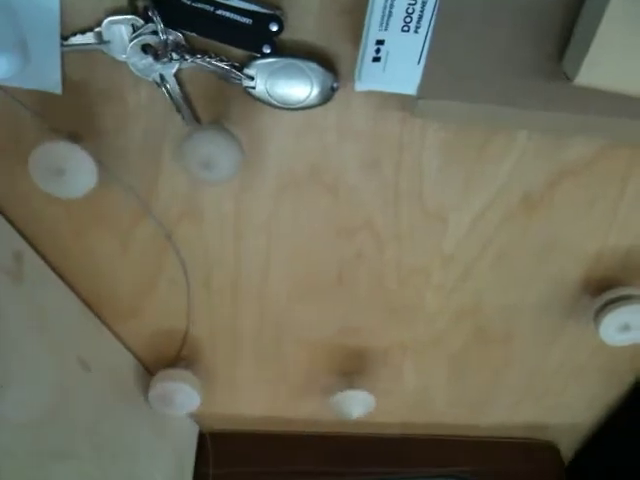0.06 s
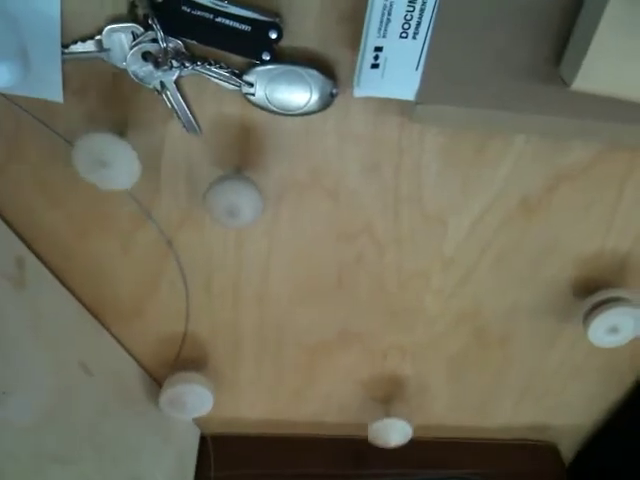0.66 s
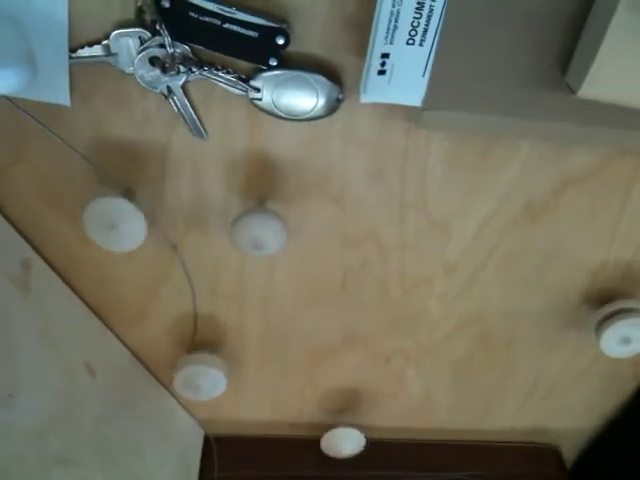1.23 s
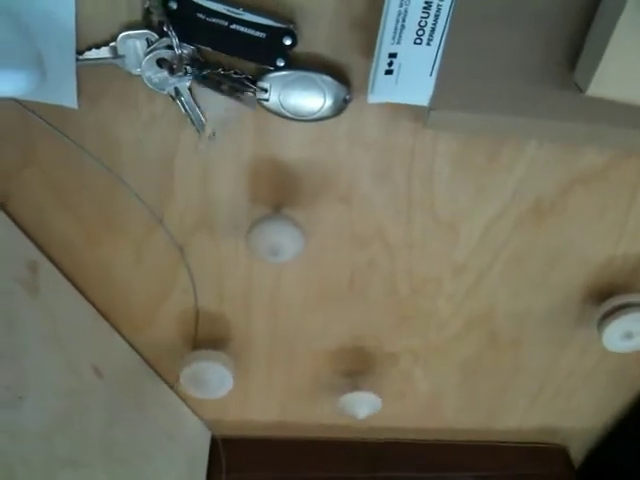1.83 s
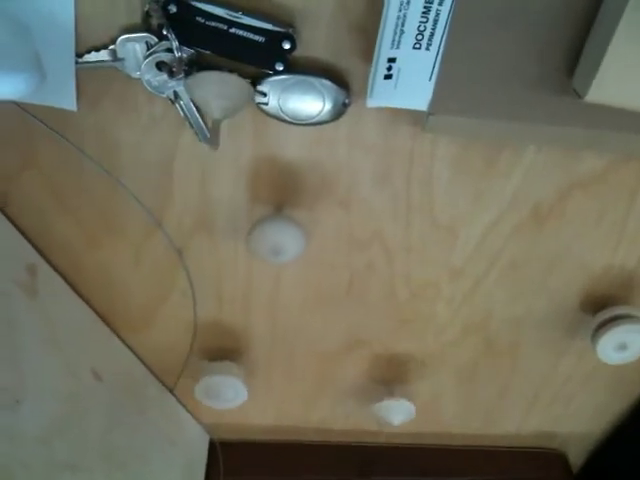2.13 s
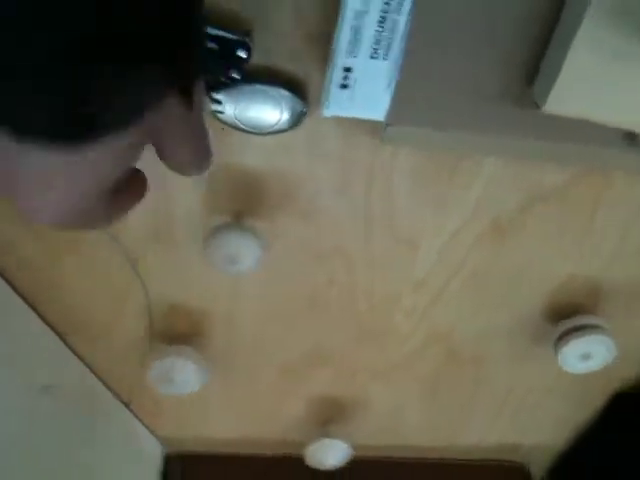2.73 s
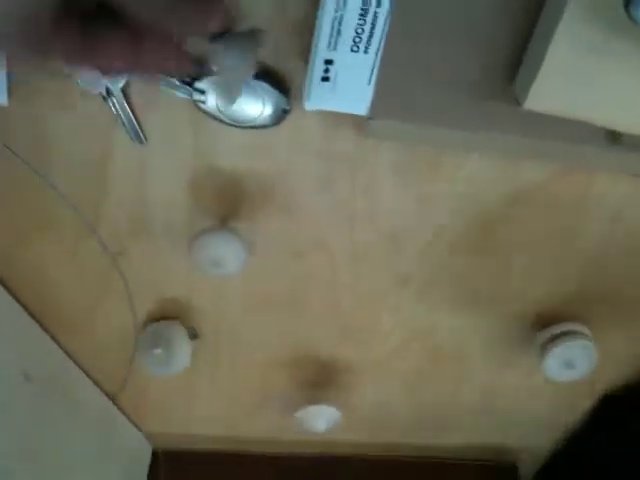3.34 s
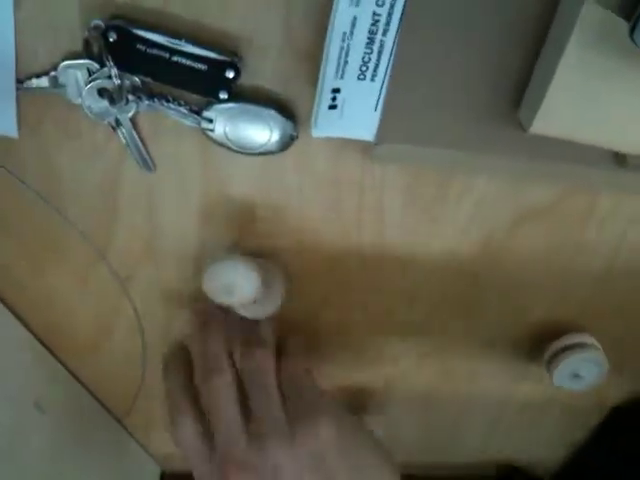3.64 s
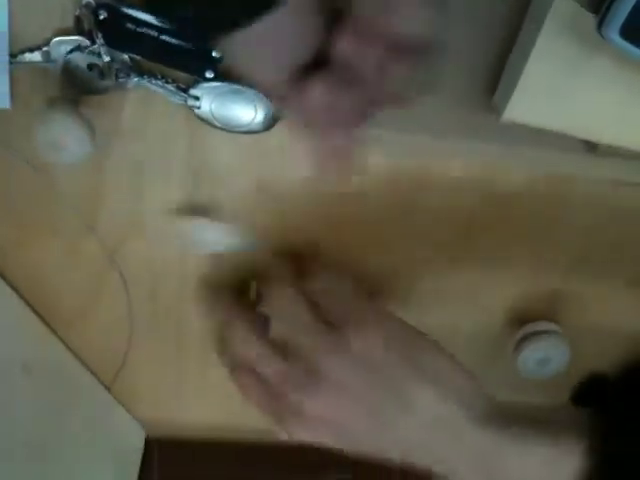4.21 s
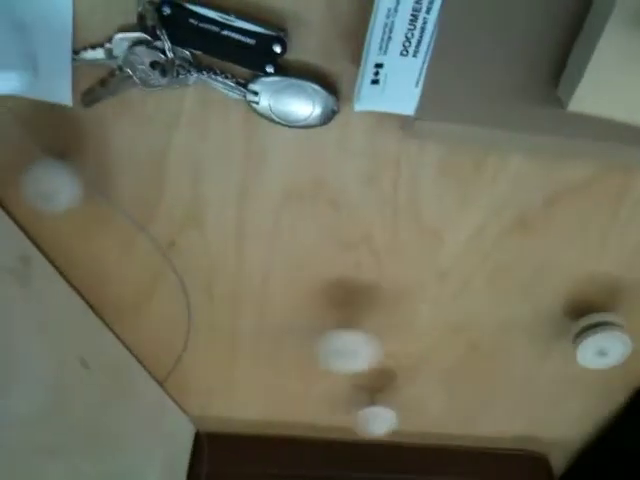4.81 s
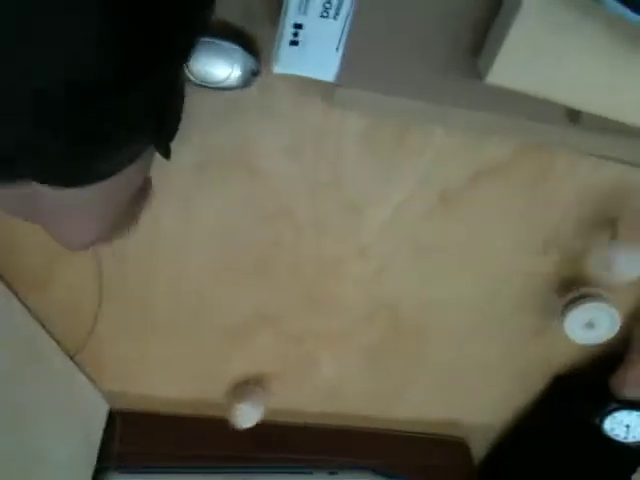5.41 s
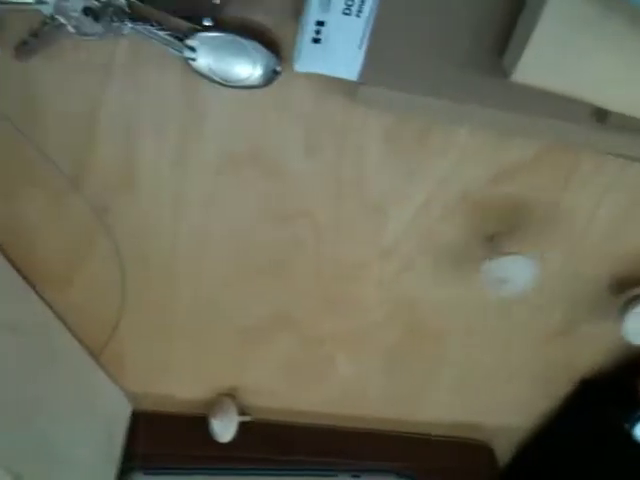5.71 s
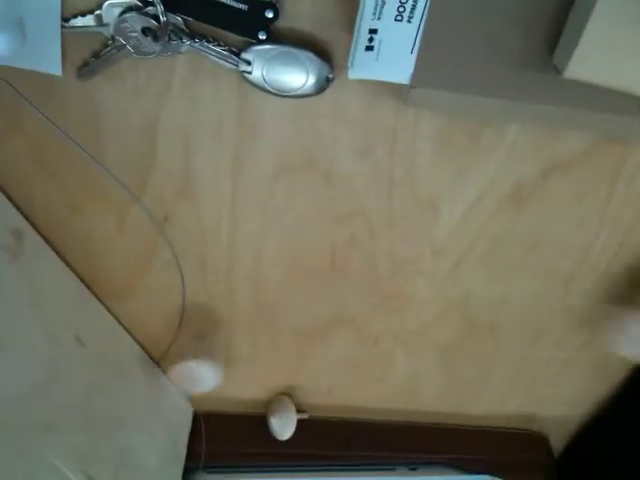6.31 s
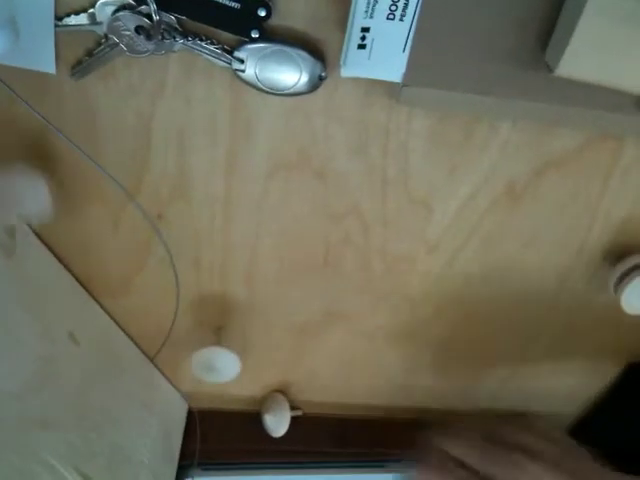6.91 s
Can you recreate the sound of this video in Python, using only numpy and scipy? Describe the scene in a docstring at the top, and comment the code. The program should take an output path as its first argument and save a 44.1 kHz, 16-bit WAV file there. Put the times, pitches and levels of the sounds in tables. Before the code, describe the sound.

Small tops spin on a plywood board, heard from close above in a small room with a faint steady hiss. A soft, wavering whirr and fine chatter run throughout, with a thin high whine at first. Around 1.4 to 2 seconds a top clicks and bounces, jostling a bunch of keys with a faint jingle. A few hollow knocks come just after 3 seconds, and a sharp collision at 3.7. Near 4 seconds a hand and sleeve swish softly past. At about 4.3 a dropped top lands with a loud crack, skids with a gritty clatter and bounces. Light taps and quick rattles continue, with a small metallic clink around 5.5 seconds. The hardest clack comes at 6.3, followed by a fast, uneven run of hollow wooden knocks until about 7 seconds.

```python
"""Spinning tops on plywood

A small room, one microphone close above a plywood board. Small tops whirr, chatter and whine as their
tips run over the grain; rims and fingers knock on the wood, ringing its modes. Tops collide, one runs
into a bunch of keys, a metal one chimes. A hand sweeps past and drops a freshly spun top, which skids
and bounces about. Behind it all lie the room's short decay and a steady hiss."""
import sys
import numpy as np
from scipy import signal
from scipy.fft import rfft, irfft, next_fast_len
from scipy.io import wavfile

SR = 44100
rng = np.random.default_rng(int(sys.argv[2]) if len(sys.argv) > 2 else 0)


def transcribe(u):
    """Save the signal u as a 16-bit wav file named by the first command-line argument.

    u: samples, shape (n,) or (channels, n), limited to [-1, 1]; the rate is SR.
    q: integer samples, one column per channel.
    """
    v = np.clip(np.atleast_2d(u).T, -1, 1)
    q = np.round(v * 32767).astype(np.int16)
    wavfile.write(sys.argv[1], SR, q)


N = 306495
TIME = np.arange(N) / SR
AGE = TIME[:SR // 8]   # seconds since a contact


# tips spinning just below the microphone: t/s, whirr level/dB, chatter level/dB (both before trim)
SPIN = [(0.0, -52.5, -53.6), (1.2, -55.5, -53), (1.66, -50.5, -47.5), (2.22, -55, -57.4),
        (2.94, -57, -61.5), (3.23, -54, -51), (4.14, -54.5, -57), (4.59, -56.5, -44.5), (4.99, -50, -50),
        (5.34, -56, -45.5), (5.57, -53.5, -45.5), (6.27, -55.5, -51.5), (6.54, -52, -49),
        (6.95, -52.5, -66)]
def spinning(whirr_trim_db=-0.98, chatter_trim_db=-6.5):
    """Smooth rolling gives a dull whirr, tiny hops a brighter chatter; both swell as the tops wobble."""
    whirr_db, chatter_db = in_time(SPIN)
    wobble_db = drift(rate=27)
    rolling = cut(board_bumps(per_s=2500, spread_db=3), 476, "low", order=1)
    whirr = rms_one(cut(rolling, 1540, "low"))
    chatter = rms_one(cut(board_bumps(per_s=900, spread_db=2), 2750, "low", order=6))
    return (whirr * from_db(whirr_trim_db + whirr_db + wobble_db)
            + chatter * from_db(chatter_trim_db + chatter_db + wobble_db))


def board_bumps(per_s, spread_db):
    """Tips bump over the grain and ring the board at six spots."""
    bumps, spot = clicks(per_s, spread_db), rng.integers(0, 6, N)
    out = np.zeros(N)
    for k in np.unique(spot):
        ring = board_ring(new_place(), place_db=1.5, detune=0.026)
        out += signal.oaconvolve(bumps * (spot == k), ring)[:N]
    return out


# modes of the plywood board: f/Hz, level/dB, t60/s
BOARD = [(268.8, -12.5, 0.044), (349.3, -13, 0.029), (605, -9.5, 0.027), (847, -8.5, 0.029),
         (1020, -4.5, 0.017), (1417, -6, 0.015), (1610, -5, 0.023), (1961, -2.5, 0.018),
         (2216, -5.5, 0.024), (2441, -4, 0.029), (2707, -10, 0.033), (2960, -6.5, 0.02), (3520, -5, 0.0065)]
def board_ring(place, place_db, detune, thump_db=0):
    """One blow on the board: its place sets how strongly each mode rings, its weight the low ones."""
    hz, db, t60 = np.transpose(BOARD)[:, :, None]
    shift = 1 + detune * rng.standard_normal(hz.shape)
    signs = (-1) ** np.arange(len(BOARD))[:, None]
    gain = from_db(db + place_db * place[:, None] + thump_db * (hz < 1200))
    modes = signs * gain * struck(t60, rise_s=0.00005) * np.sin(2 * np.pi * hz * shift * AGE)
    return attack_one(modes.sum(axis=0))


def new_place():
    """A random spot on the board, as one weight for each mode."""
    return rng.standard_normal(len(BOARD))


# the hardest contacts: t/s, board level/dB, crack level/dB, top's ring level/dB
STRIKES = [(1.4443, -37, -44, -64), (1.459, -45, -48, -44), (1.7278, -41.5, -39, -30),
           (3.7148, -37, -37.5, -34.5), (4.3465, -24, -27.5, -60), (4.3507, -28.5, -34, -38),
           (4.4246, -28.5, -34.5, -44), (4.4625, -32, -34, -47), (4.472, -29.5, -35.5, -43),
           (4.7371, -34.5, -42, -61), (5.5, -36, -54, -49), (5.5423, -44, -48, -34.5),
           (5.578, -34.5, -50, -40), (6.3372, -18.5, -40, -30.5), (6.411, -27, -44, -40),
           (6.4687, -27.5, -37.5, -41)]
# spectrum of a contact's dry crack: f/Hz, level/dB
CRACK_SPECTRUM = [(2400, -9), (3400, 9), (4200, 12.5), (5300, 1.5), (6300, -5), (8000, 4.5), (12000, -13.5),
                  (16000, -19)]
# the two notes of whichever top is being knocked about: from t/s, main f/Hz, second f/Hz
TOP_NOTES = [(0, 7950, 9000), (1.3, 10850, 7250), (2.5, 9135, 6168), (4.2, 10970, 7800), (5.52, 8480, 6400),
             (6.1, 8020, 8400)]
def strikes():
    """A hard contact cracks and rings both board and top; quick bounces land on the same spot."""
    out, rough, last = np.zeros(N), noise(CRACK_SPECTRUM), -1
    for s, board_db, crack_db, ring_db in STRIKES:
        if s - last > .03:
            place, start = new_place(), rng.integers(N - len(AGE))
        last = s
        crack = attack_one(rough[start:start + len(AGE)] * struck(t60=0.016, rise_s=0.00032))
        _, main_hz, second_hz = TOP_NOTES[sum(s > row[0] for row in TOP_NOTES[1:])]
        main = top_ring(main_hz, t60=0.016, snap_db=-13.5)
        second = top_ring(second_hz, t60=0.0027, snap_db=-6.0)
        ring = attack_one(main + from_db(-3.5) * second)
        board = board_ring(place, place_db=2.0, detune=0.02, thump_db=thump_at(s))
        board = with_hollow(board, s, hollow_db=-9)
        # a brief, hard contact puts less into the board's bass
        board = attack_one(cut(board, 170, "high", order=1))
        add(out, s, from_db(board_db) * board + from_db(crack_db) * crack + from_db(ring_db) * ring)
    return out


def top_ring(hz, t60, snap_db):
    """A top's own high, short note, started by a gritty snap."""
    tone = np.sin(2 * np.pi * hz * (1 + rng.normal(0, 0.0031)) * AGE)
    note = attack_one(tone * struck(t60, rise_s=0.00035))
    burst = rng.standard_normal(len(AGE)) * struck(t60=0.018, rise_s=0.00061)
    snap = attack_one(cut(burst, [0.83 * hz, 1.28 * hz], "band"))
    return attack_one(note + from_db(snap_db) * snap)


# lift of the board's low modes in a contact: t/s, level/dB
THUMP = [(1.75, 3.5), (3.75, 4), (4.35, 0.5), (5.0, -2.5), (5.31, 1), (5.7, -6.5), (6.34, -1), (6.65, 2.5)]
def thump_at(s):
    """The low modes are full in falls and thin in light skittering."""
    return np.interp(s, *np.transpose(THUMP))


# hollow note of a contact: t/s, f/Hz
HOLLOW_NOTE = [(3.15, 1730), (3.75, 2014), (4.35, 1020), (4.42, 2000), (4.85, 2200), (5.05, 1867),
               (5.31, 2471), (5.46, 1930), (6.67, 1940), (6.89, 1950)]
def with_hollow(board, s, hollow_db):
    """Add a hollow, woody note, which shifts as the tops wander over the board."""
    hollow = resonance(board, np.interp(s, *np.transpose(HOLLOW_NOTE)), width_hz=240)
    return attack_one(board + from_db(hollow_db) * attack_one(hollow))


def taps():
    """A rim or hand rings the board with a hollow note and faint dry edge; quick touches share a spot."""
    out, last = np.zeros(N), -1
    rough = cut(noise(CRACK_SPECTRUM), 4300, "low")
    for s, board_db, edge_db, hollow_db in soft_touches():
        if abs(s - last) > .019:
            place = new_place()
        last = s
        start = rng.integers(N - len(AGE))
        edge = attack_one(rough[start:start + len(AGE)] * struck(t60=0.021, rise_s=0.00038))
        board = board_ring(place, place_db=2.2, detune=.015, thump_db=thump_at(s))
        board = with_hollow(board, s, hollow_db)
        # a soft contact leaves the board's treble quiet
        board = attack_one(cut(board, 3050, "low", order=4))
        add(out, s, from_db(board_db) * board + from_db(edge_db) * edge)
    return out


# dull knocks on the wood, alone or in quick runs, from a rim or hand: t/s, board level/dB
KNOCKS = [(2.021, -49.5), (3.1057, -39), (3.1606, -34.5), (3.203, -41.5), (3.701, -39.5), (3.734, -58),
          (4.245, -51.5), (4.303, -42.5), (4.8056, -36.5), (5.531, -37.5), (6.5249, -30.5), (6.547, -41.2),
          (6.5655, -35.2), (6.5922, -37), (6.61, -38.5), (6.633, -33.5), (6.6712, -32.5), (6.6939, -34),
          (6.7314, -31), (6.76, -32), (6.7908, -34.3), (6.8146, -38.5), (6.8418, -40.5), (6.8933, -31.5),
          (6.93, -32.5), (6.9401, -29.2)]
# a top bounces on its rim: t/s, board level/dB, edge level/dB, first hop/s, number of touches
BOUNCES = [(1.3736, -45, -51, 0.0082, 2), (1.475, -45, -50.5, 0.019, 3), (1.7825, -39.5, -53, 0.024, 4),
           (3.754, -29, -47.5, 0.029, 2), (4.564, -32, -40.5, 0.053, 2), (4.831, -35, -54, 0.026, 2),
           (4.8716, -38.5, -65, 0.021, 3), (4.931, -37.5, -54, 0.019, 4), (4.979, -37.5, -65, 0.024, 2),
           (5.136, -36.5, -44, 0.028, 5), (5.3099, -34.5, -48, 0.038, 4), (5.4565, -35, -46, 0.0058, 2)]
# quick runs of light taps, from a leaning top or fingers bumping the board:
# start t/s, end t/s, tap rate/Hz, board level/dB
TAP_RUNS = [(3.115, 3.139, 114, -45), (3.8, 3.843, 102, -45.5), (4.014, 4.097, 56, -49),
            (4.625, 4.68, 42, -42.5), (5.012, 5.106, 81, -44), (5.591, 5.665, 60, -48),
            (5.689, 5.722, 60, -43), (5.768, 5.824, 72, -46), (5.838, 5.897, 71, -45),
            (5.931, 5.972, 121, -49.5), (6.064, 6.099, 120, -47), (6.222, 6.271, 124, -48)]
def soft_touches(hop_ratio=.8, loss_db=3, hollow_db=-6, run_hollow_db=1):
    """Dull knocks, bounces that get shorter and weaker, and evenly spaced runs of light taps."""
    # t/s, board level/dB, edge level/dB, hollow note against the board/dB
    touches = [(s, board_db, board_db - 24, hollow_db) for s, board_db in KNOCKS]
    for s, board_db, edge_db, hop_s, count in BOUNCES:
        for k in range(round(count)):
            touches.append((s, board_db - k * loss_db, edge_db - k * loss_db, hollow_db))
            s += hop_s * hop_ratio ** k
    for start, end, taps_per_s, board_db in TAP_RUNS:
        for s in np.arange(start, end, 1 / taps_per_s):
            db = board_db + rng.normal(0, 2.3)
            touches.append((s, db, db - 25, run_hollow_db))
    return touches


def skid(start_s=4.355, db=-41.5, t60=0.49):
    """The dropped top lands at full spin and grinds over the wood: a dense, bright, dying clatter."""
    envelope = np.zeros(N)
    add(envelope, start_s, from_db(db) * dying(t60, TIME[:SR]))
    grit = cut(clicks(per_s=3300, spread_db=-1), [1000, 5000], "band", order=4)
    return envelope * rms_one(cut(grit, 4500, "low", order=1))


def thuds():
    """A faint low thud near 135 Hz under each strike and knock."""
    pulses, pulse = np.zeros(N), attack_one(struck(t60=0.033, rise_s=0.0017))
    for s, board_db, *_ in list(STRIKES) + list(KNOCKS):
        add(pulses, s, from_db(board_db - 19) * pulse)
    return resonance(pulses, hz=135, width_hz=30)


# single grazes of a rim: t/s, ring level/dB
GRAZES = [(3.02, -55.5), (3.616, -56), (5.112, -45.5), (6.202, -49), (6.3758, -39.5)]
def grazes(note_hz=7950):
    """A nudge or graze rings a top's own note; it also sounds faintly with each knock."""
    out = np.zeros(N)
    with_knocks = [(s, board_db - 20) for s, board_db in KNOCKS]
    for s, db in nudges() + list(GRAZES) + with_knocks:
        add(out, s, from_db(db) * top_ring(note_hz, t60=0.026, snap_db=-2.5))
    return out


def nudges(count=8, start_s=.0208, first_gap_s=.041, gap_growth=1.055, db=-53):
    """Two tops nudge each other ever more slowly as they drift apart: rows of t/s, level/dB."""
    gaps = first_gap_s * gap_growth ** np.arange(count)
    return [(s, db + rng.normal(0, 1)) for s in start_s + np.cumsum(gaps) - gaps]


# hits on the metal top: t/s, level/dB
CHIMES = [(5.524, -48.5), (5.556, -46.5), (5.574, -54)]
# modes of the metal top: f/Hz, level/dB, t60/s
METAL_MODES = [(6210, 4, 0.18), (6340, 1, 0.13), (6800, 11, 0.016), (8100, 6, 0.011)]
def chimes():
    """The metal top clinks under quick touches that catch each mode differently, then buzzes faintly."""
    out, age = np.zeros(N), TIME[:SR // 2]
    contact = (1 - np.exp(-age / .003)) * (dying(0.04, age) + from_db(-20) * dying(.4, age))
    for s, db in CHIMES:
        for hz, mode_db, t60 in METAL_MODES:
            touches = energy_one(clicks(per_s=860, spread_db=7)[:len(age)] * contact)
            ring = dying(t60, age) * np.sin(2 * np.pi * hz * age)
            add(out, s, from_db(db + mode_db) * signal.oaconvolve(touches, ring))
    return out


# a top runs into the keys: t/s, level/dB
KEY_HITS = [(1.475, -51.5), (1.977, -60)]
# modes of the keys: f/Hz, width/Hz
KEY_MODES = [(4200, 2840), (7800, 970), (9100, 470), (10800, 280)]
def keys(t60=0.53):
    """Pushed keys jostle each other in a dying shower of tiny clinks."""
    clinks, motion = clicks(per_s=600, spread_db=3.5), np.zeros(N)
    jangle = rms_one(sum(resonance(clinks, hz, width_hz) for hz, width_hz in KEY_MODES))
    for s, db in KEY_HITS:
        add(motion, s, from_db(db) * dying(t60, TIME[:SR]))
    return jangle * motion


# a dry tip keeps its top singing: start t/s, end t/s, f/Hz, width/Hz, level/dB, catch rate/Hz
WHINES = [(0, 0.43, 7950, 1500, -63.5, 1000), (0, 1.3, 4130, 520, -73, 670),
          (0.2, 2.4, 13600, 900, -77.5, 1800), (5.1, 6.4, 10770, 754, -69.5, 310),
          (6.165, 6.18, 8600, 706, -59, 930)]
def whines():
    """A tip catches on the wood and rings its top: a thin whine if often, specks and pings if seldom."""
    out, grip = np.zeros(N), from_db(3 * drift(rate=150) + 2.5 * drift(rate=14))
    for start, end, hz, width_hz, db, per_s in WHINES:
        catches = clicks(per_s, spread_db=2.5) * grip
        whine = rms_one(resonance(resonance(catches, hz, width_hz), hz, width_hz))
        fade_s = .2 * (end - start)
        fade = np.clip(np.minimum(TIME - start, end - TIME) / fade_s + .5, 0, 1)
        out += from_db(db) * fade * whine
    pings = sum(resonance(clicks(per_s=8, spread_db=2.5), hz, width_hz=200) for hz in TOP_NOTES[0][1:])
    return out + from_db(-74.5) * rms_one(pings)


# hand and sleeve pass over the board, near the microphone: start t/s, length/s, level/dB
SWEEPS = [(3.994, 0.11, -57.5), (4.098, 0.18, -58.5), (4.65, 0.38, -61.5)]
# spectrum of sliding skin and cloth: f/Hz, level/dB
SLEEVE_SPECTRUM = [(1000, 1), (3000, 0.5), (8000, 3.5), (11000, 1), (16000, -4)]
def hand_sweeps():
    """Skin and cloth slide with an uneven hiss that swells and fades with each sweep."""
    swells = sum(from_db(db) * np.sin(np.pi * np.clip((TIME - start) / length, 0, 1))
                 for start, length, db in SWEEPS)
    return noise(SLEEVE_SPECTRUM) * swells * from_db(4.5 * drift(rate=300))


# echoes from boxes and walls close to the board: delay t/s, level/dB
ECHOES = [(.0031, -24), (.0083, -26.5)]
# decay of the small room: f/Hz, t60/s
ROOM_T60 = [(150, 0.36), (2500, 0.36), (5000, 0.65), (12000, 0.15)]
def room(x):
    """The direct sound reaches the microphone first, then close echoes and a soft, diffuse tail."""
    age = TIME[:SR * 2 // 3]
    edges_hz = np.geomspace(100, 16000, 9)
    tail = np.zeros(len(age))
    for low, high in zip(edges_hz, edges_hz[1:]):
        band = cut(rng.standard_normal(len(age)), [low, high], "band")
        tail += band * dying(at_hz(ROOM_T60, np.sqrt(low * high)), age)
    tail = energy_one(tail * (1 - np.exp(-age / 0.0023)))
    response = from_db(-12) * cut(tail, 3100, "low", order=1)
    for s, db in ECHOES:
        add(response, s, from_db([db]))
    return x + signal.oaconvolve(x, response)[:N]


# spectrum of the background at the microphone: f/Hz, level/dB
HISS_SPECTRUM = [(25, -1), (90, -11.5), (170, 12.5), (400, 14), (3000, -3.5), (4200, 1.5), (8200, -1.5),
                 (10500, -6), (12500, -10.5), (16000, -10.5)]
def hiss(db=-61.5):
    """A faint, steady hiss, fullest in the low mids."""
    return from_db(db) * noise(HISS_SPECTRUM)


def from_db(db):
    return 10 ** (np.asarray(db) / 20)


def rms_one(x):
    return x / np.sqrt(np.mean(x ** 2) + 1e-20)


def energy_one(x):
    return x / np.sqrt(np.sum(x ** 2) + 1e-20)


def attack_one(x):
    """Scale so that the first 10 ms have rms 1."""
    return x / np.sqrt(np.mean(x[:SR // 100] ** 2) + 1e-20)


def in_time(rows):
    """The columns of a curve, sample by sample."""
    s, *columns = np.transpose(rows)
    return [np.interp(TIME, s, column) for column in columns]


def at_hz(points, hz):
    """Read a table on a log-frequency axis."""
    points_hz, values = np.transpose(points)
    return np.interp(np.log(hz + 1e-9), np.log(points_hz), values)


def noise(spectrum):
    """Noise of a given colour, rms 1."""
    size = next_fast_len(N)
    gain = from_db(at_hz(spectrum, np.fft.rfftfreq(size, 1 / SR)))
    return rms_one(irfft(rfft(rng.standard_normal(size)) * gain, size)[:N])


def clicks(per_s, spread_db):
    """Tiny impacts of random size at random moments."""
    sizes = from_db(spread_db * np.minimum(rng.exponential(1, N), 4)) * rng.choice([-1, 1], N)
    return sizes * (rng.random(N) < per_s / SR)


def drift(rate):
    """A line wandering through `rate` random values a second."""
    points = rng.standard_normal(2000)
    return np.interp(TIME * rate, np.arange(len(points)), points)


def cut(x, hz, kind, order=2):
    """Butterworth filter."""
    sections = signal.butter(order, np.minimum(hz, .45 * SR), kind, fs=SR, output="sos")
    return signal.sosfilt(sections, x + 1e-18)


def resonance(x, hz, width_hz):
    """One resonance, gain 1 at its peak."""
    return signal.lfilter(*signal.iirpeak(hz, hz / width_hz, fs=SR), x + 1e-18)


def dying(t60, age=AGE):
    """A decay of 60 dB in t60 seconds."""
    return np.exp(-np.log(1000) * age / t60)


def struck(t60, rise_s):
    """A quick swell, then a decay."""
    return (1 - np.exp(-AGE / rise_s)) * dying(t60)


def add(track, s, sound):
    """Mix a sound in at time s."""
    start = max(round(s * SR), 0)
    track[start:start + len(sound)] += sound[:max(N - start, 0)]


def scene():
    """Tops, keys and hand in the small room, in mono from close above, over a steady hiss."""
    wood = cut(strikes() + taps() + spinning() + skid(), 190, "high") + thuds()
    direct = wood + grazes() + whines() + chimes() + keys() + hand_sweeps()
    return (room(direct) + hiss())[None]


def record(dry):
    """The microphone's signal is cut steeply above 15.9 kHz."""
    return signal.sosfilt(signal.ellip(10, .2, 70, 15900, fs=SR, output="sos"), dry)


dry = scene()
out = record(dry)
transcribe(out)
```